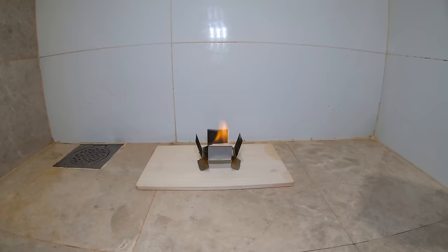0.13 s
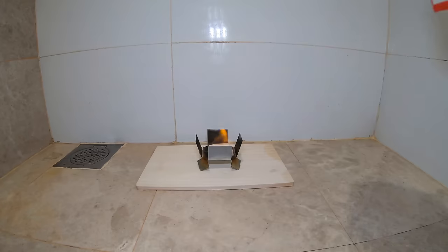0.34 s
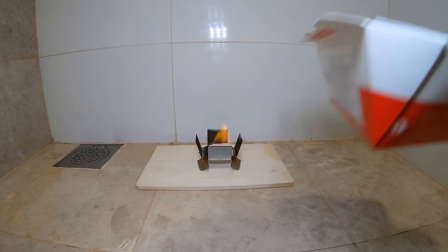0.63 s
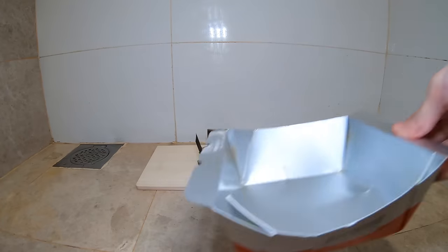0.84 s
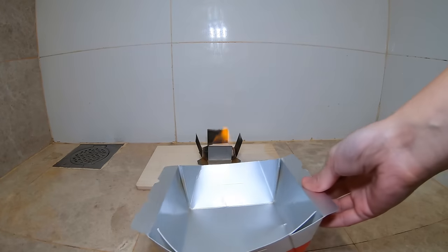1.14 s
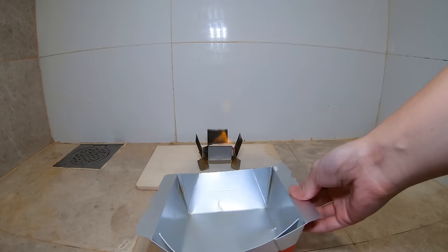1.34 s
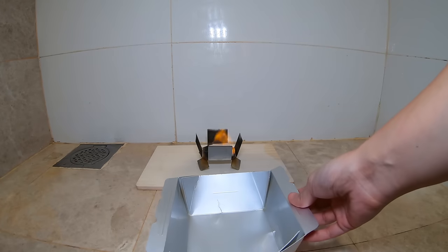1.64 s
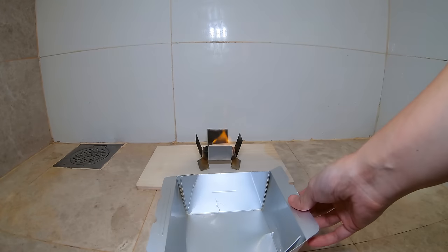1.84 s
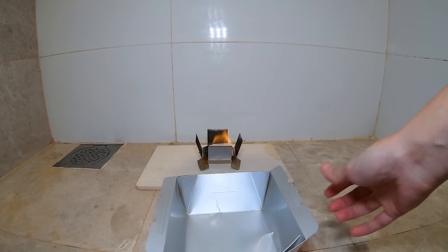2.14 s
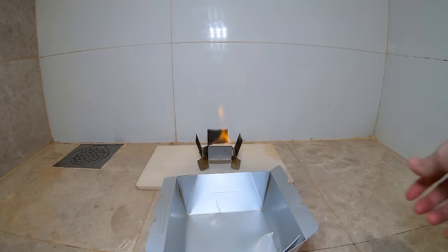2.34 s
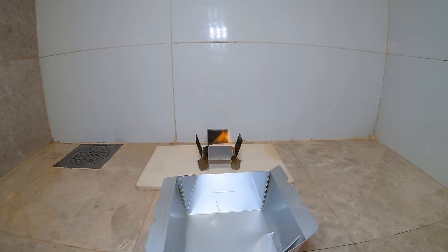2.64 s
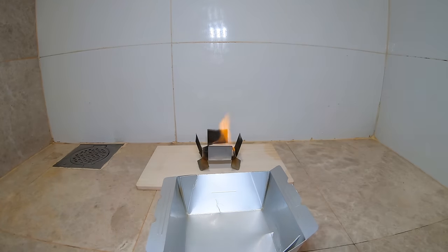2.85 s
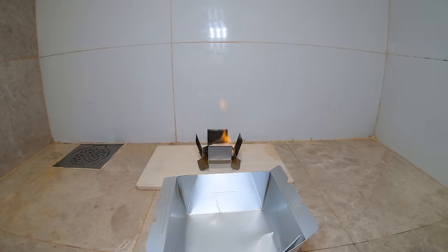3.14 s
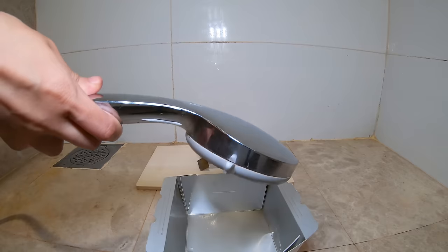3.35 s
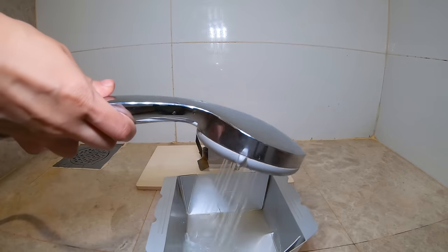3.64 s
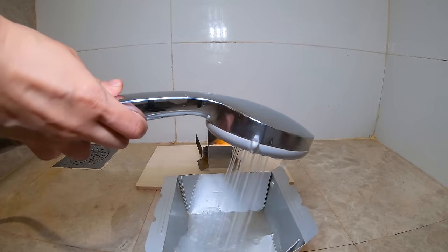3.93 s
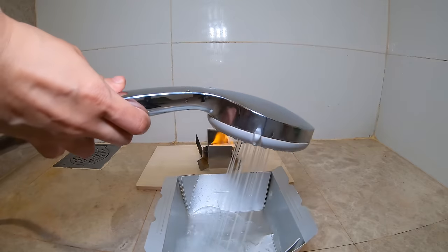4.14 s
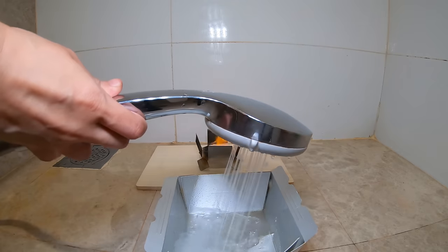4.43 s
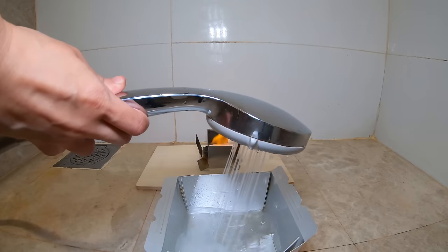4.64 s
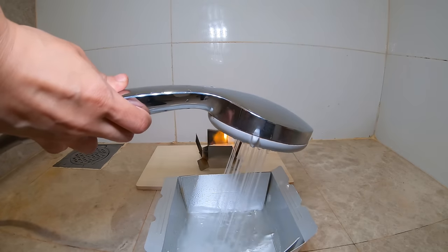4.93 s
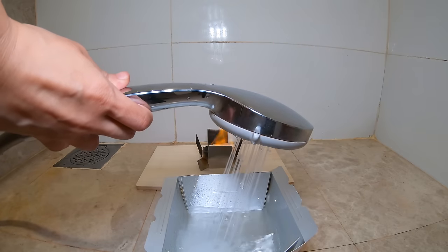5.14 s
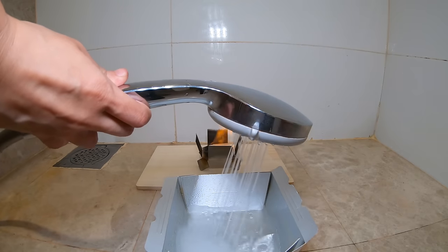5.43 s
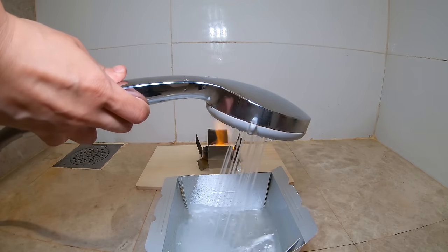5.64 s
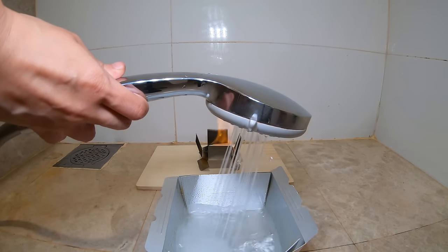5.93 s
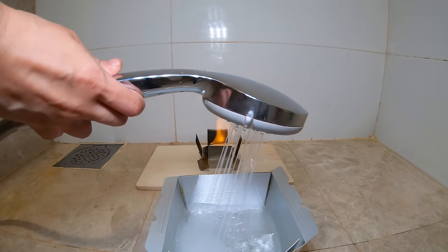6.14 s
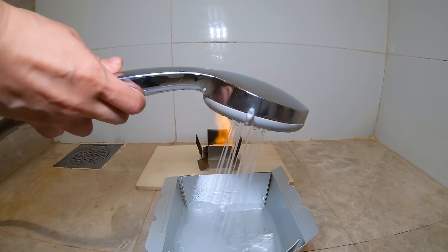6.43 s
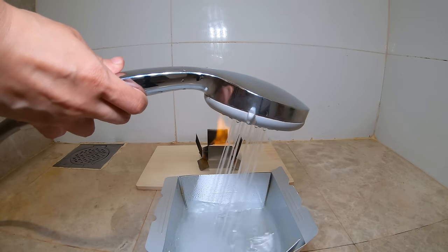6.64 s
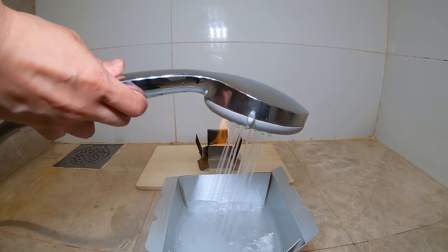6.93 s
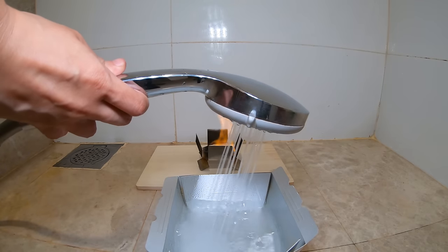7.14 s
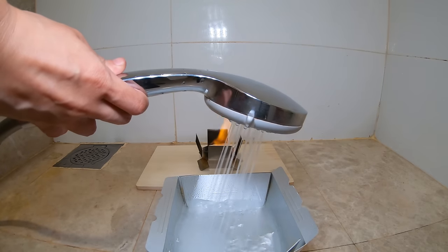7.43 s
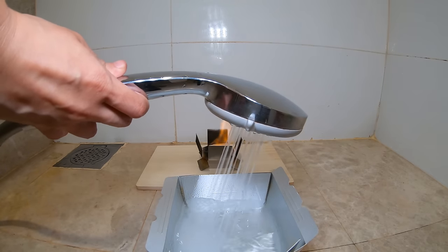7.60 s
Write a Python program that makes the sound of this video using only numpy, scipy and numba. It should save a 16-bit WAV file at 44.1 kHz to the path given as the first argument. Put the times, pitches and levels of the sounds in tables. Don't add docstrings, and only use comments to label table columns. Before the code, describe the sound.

Close to a small microphone in a tiled shower stall, low building rumble sits under faint rustles and foil ticks. A card tray lands with a hollow, ringing thud. After quiet handling, a few drips smack the foil, the shower head spits twice, then bursts into dense spray. Patter on bare foil turns to splashing water with bubbly gurgling as the tray fills.

```python
import sys
import numpy as np
from scipy import signal
from scipy.fft import rfft, irfft, next_fast_len
from scipy.io import wavfile
from scipy.ndimage import uniform_filter1d
from numba import njit

SR = 44100
rng = np.random.default_rng(int(sys.argv[2]) if len(sys.argv) > 2 else 0)


def invert_db(level):
    return 10 ** (np.asarray(level, dtype=float) / 20)


def unload_audio(sound):
    columns = np.transpose(np.atleast_2d(sound))
    steps = np.round(np.clip(columns, -1, 1) * 32767)
    wavfile.write(sys.argv[1], SR, steps.astype(np.int16))


N = 342657
T = np.arange(N) / SR
TAP_S, FULL_S = 3.591, 7.7


def unit(x):
    return x / np.sqrt(np.mean(x ** 2))


def colour(x, shape):
    hz, db = np.transpose(shape)
    f = np.maximum(np.arange(len(x) // 2 + 1) * SR / len(x), 1)
    gain = invert_db(np.interp(np.log(f), np.log(hz), db, left=-90, right=-90))
    return unit(irfft(rfft(x) * gain, len(x)))


def walk(rate):
    hold = int(SR / rate)
    steps = np.repeat(rng.standard_normal(N // hold + 1), hold)
    return 1.4 * uniform_filter1d(uniform_filter1d(steps, hold), hold)[:N]


def bump(s, length):
    return np.cos(np.pi * np.clip((T - s) / length, -.5, .5)) ** 2


def drops(spread_db):
    return rng.standard_normal(N) * invert_db(spread_db * rng.exponential(size=N))


@njit
def rings(start, hz, t60, glide, size):
    out = np.zeros(N)
    for k in range(len(start)):
        z = size[k] + 0j
        p = np.exp(2j * np.pi * hz[k] / SR - np.log(1000) / (t60[k] * SR))
        length = int(t60[k] * SR * .7)
        turn = np.exp(2j * np.pi * hz[k] / SR * glide[k] / length)
        for i in range(start[k], min(N, start[k] + length)):
            out[i] += z.imag
            z *= p
            p *= turn
    return out


def resonances(f, modes):
    return sum(gain * 1j * f * w / (m * m - f * f + 1j * f * w) for m, w, gain in modes)


def depth():
    return np.clip((T - TAP_S) / (FULL_S - TAP_S), 0, 1)


def filling(shallow_db, bare_db, cover_s, full_db, power):
    bare_foil = np.exp(-np.abs((T - TAP_S) / cover_s) ** 4)
    return shallow_db + bare_db * bare_foil + full_db * depth() ** power


# start_s, level_db
FLOW = [
    (3.591, -22),
    (3.6, -15),
    (3.621, -15),
    (3.664, -23.5),
    (3.692, -18.5),
    (3.712, -24),
    (3.743, -13),
    (3.9, -16.5),
    (4.08, -15.5),
]


def froth_db():
    s, db = np.transpose(FLOW)
    return np.interp(T - 0.021, s, db - db[-1], left=-25)


# middle_s, length_s, rustle_db, dull_rustle_db, stall_stir_db
MOVES = [(0.01, 0.12, -70, -66, 12), (0.5, 0.36, -64, -79, 6.5), (0.66, .2, -74, -64, 6),
         (1.056, 0.5, -75, -66, 10.5), (1.32, .2, -71, -67, 4), (1.628, 0.19, -65, -60, 14.5),
         (1.76, .2, -61, -55, 4), (2, 0.11, -56, -58, 1), (2.04, .1, -64, -66, 8), (1.9, 0.73, -65, -64, 8),
         (2.237, 0.14, -66, -72, 7), (2.44, 0.18, -66, -72, 6), (2.58, 0.23, -62, -56, 9),
         (2.79, 0.49, -59, -62, 3), (3.2, 0.74, -60.5, -82, 4), (3.51, 0.12, -52, -62, 11),
         (3.57, 0.13, -38, -33, 10)]
# pitch_hz, level_db (per Hz)
RUMBLE_SHAPE = [(6, -36), (11, 12), (18, -5), (30, -9.5), (42, -13), (48, -3.5), (55, -9.5), (78, -15.5),
                (89, -8.5), (98, -18), (135, -43)]
# pitch_hz, level_db (per Hz)
AIR = [(71, -52), (120, -3.5), (141, -3.5), (271, -2), (313, -11.5), (353, -8), (460, -14), (651, -11),
       (751, -11.5), (1300, -19.5), (2300, -24), (7350, -27), (15600, -37)]
# pitch_hz, width_hz, level_db
BOOM_MODES = [(189, 28, -4.5), (272.8, 12.7, -1), (354, 40, 1), (413.3, 13.2, 0.5), (503.6, 13, -4)]


def background():
    duck_s, fall_s, recover_db_per_s = 3.8, .35, 3
    fall = np.clip((T - duck_s) / fall_s, 0, 1)
    recovery_db = recover_db_per_s * np.maximum(T - duck_s - fall_s, 0)
    duck_db = np.minimum(-8.5 * fall + recovery_db, 0)
    stir_db = sum(db * bump(s, 1.47 * length) for s, length, _, _, db in MOVES)
    wet = T > TAP_S
    wet_air_db = filling(shallow_db=-69.5, bare_db=18, cover_s=.5, full_db=13, power=0.1)
    drum_db = filling(shallow_db=-57, bare_db=16.5, cover_s=0.6, full_db=19.5, power=1.2)
    air_gain = invert_db(-53.5 + 0.19 * stir_db + 0.91 * duck_db) + wet * invert_db(wet_air_db + 0.5 * froth_db())
    boom_gain = invert_db(-62.5 + stir_db + duck_db) + wet * invert_db(drum_db + 0.21 * froth_db())

    rumble = colour(rng.standard_normal(N), RUMBLE_SHAPE) * invert_db(-33.5 + duck_db + 1.9 * walk(5.02))
    air_shape = AIR + [(16500, AIR[-1][1])]
    air = colour(rng.standard_normal(N), air_shape) * air_gain * invert_db(0.28 * walk(6))
    f = np.arange(N // 2 + 1) * SR / N
    peaks = resonances(f, [(m, w, invert_db(db)) for m, w, db in BOOM_MODES])
    boom = unit(irfft(rfft(rng.standard_normal(N)) * peaks ** 2, N))
    return rumble + air + boom * boom_gain * invert_db(-2.0 + 1.6 * walk(9))


# pitch_hz, width_hz, level_db (over the even response)
STALL = [(87, 14, -5), (170, 130, -8), (248, 8.4, 9.5), (357, 18, 5), (421, 5.8, -21), (470, 49, -1.5),
         (613, 12, 1.5), (926, 27, 7.5), (1109, 10, 7), (1187, 58, 5.5), (1334, 35, 3.5), (1770, 93, 1.5),
         (2500, 160, 1.5), (2800, 150, 0.5), (3940, 41, 4)]
# pitch_hz, t60_s
STALL_T60 = [(100, 0.15), (500, 0.94), (2000, 0.63), (8000, 0.11), (16000, 0.33)]


def stall(x, wet_db):
    t = T[:SR]
    hz, t60 = np.transpose(STALL_T60)
    tail = 0
    for centre in 100 * 2. ** np.arange(8):
        band = colour(rng.standard_normal(SR), [(centre / 2, -20), (centre, 0), (centre * 2, -20)])
        decay = invert_db(-60 * t / np.interp(np.log(centre), np.log(hz), t60))
        tail = tail + band * np.sqrt(centre / SR) * decay
    tail = tail * (t > .003) * invert_db(wet_db) / 30
    tail[0] = 1
    size = next_fast_len(N + SR)
    f = np.arange(size // 2 + 1) * SR / size
    modes = 1 + resonances(f, [(m, w, invert_db(db) - 1) for m, w, db in STALL])
    return irfft(rfft(x, size) * rfft(tail, size) * modes, size)[:N]


# pitch_hz, level_db (per Hz)
RUSTLE = [(1500, -11), (3000, -6.5), (7000, 1.5), (10000, -2.5), (15500, -17)]


def hand():
    rest = invert_db(-69)
    bright_gain = rest + sum(invert_db(db) * bump(s, length) for s, length, db, _, _ in MOVES)
    dull_gain = rest + sum(invert_db(db) * bump(s, length) for s, length, _, db, _ in MOVES)
    bright = colour(drops(2.6), RUSTLE) * bright_gain * invert_db(-2.5 + 1.0 * walk(26.9))
    dull = colour(drops(1.5), [(700, -13), (1500, -2.5), (3200, -4.0), (5000, -9)])
    dull = dull * dull_gain * invert_db(-5.5 + 1.2 * walk(25.8))
    return (bright + dull) * (T < FLOW[1][0])


# pitch_hz, level_db (per Hz)
SIZZLE = [(8000, -1), (10500, -3), (13000, -8), (15700, -10.5), (16500, -40)]


def crackles(events, top_db, t60_s):
    out = np.zeros(N)
    t = T[:SR // 5]
    rise = np.clip(t / 0.0013, 0, 1)
    snap = 1 + 1.3 * np.exp(-t / 0.0015)
    for s, db, hz, low_db in events:
        noise = rng.standard_normal((3, len(t)))
        ring_shape = [(hz / 4, -20), (hz * 0.82, -7), (hz, 0), (hz * 1.18, -7), (hz * 4.7, -19)]
        high = colour(noise[0], ring_shape)
        low = colour(noise[1], [(500, -6.5), (1300, -4), (3000, -16.0)])
        top = colour(noise[2], SIZZLE)
        burst = high + invert_db(low_db) * low + invert_db(top_db) * top
        i = int(s * SR)
        out[i:i + len(t)] += invert_db(db - 7 - 60 * t / t60_s) * rise * snap * burst
    return out


# start_s, peak_db, pitch_hz, low_part_db
TICKS = [(0.429, -49, 1300, -2), (0.4589, -46, 7870, -15), (0.4794, -49, 7040, -14), (0.574, -50, 3580, -6),
         (0.604, -43, 8050, -29.5), (0.6454, -48, 3500, -2), (0.799, -48, 1600, -4),
         (1.311, -47, 7000, -12), (1.497, -32, 3290, 5), (1.675, -45, 3090, -3), (1.6841, -44, 3510, 5),
         (1.7394, -42, 2500, 0), (1.769, -45.5, 2570, -3), (1.7894, -51, 2550, -11),
         (1.8194, -48, 6800, -9), (1.8547, -43, 7240, -9), (1.929, -53, 4330, 0), (1.9693, -45, 900, -6),
         (1.9806, -36, 1850, -7), (1.9967, -35, 3570, -20), (2.0594, -47, 6960, -17),
         (2.1045, -41, 7140, -9), (2.202, -43, 6520, -9), (2.3096, -48, 6700, -15),
         (2.801, -32.5, 7960, -15), (3.0729, -48, 3560, 1), (3.303, -43, 5270, -12), (3.3317, -51, 2750, 0),
         (3.3767, -42, 7170, -21)]


def ticks():
    return crackles(TICKS, top_db=-21, t60_s=0.057)


# start_s, peak_db
KNOCKS = [(0.643, -43), (0.912, -39), (1.043, -41), (1.302, -44), (1.498, -11.5), (1.684, -43),
          (1.967, -44), (1.985, -34), (2.205, -47), (3.329, -42), (3.589, -31), (3.621, -25.5)]
# pitch_hz, level_db, t60_s
POT = [(187, -31, 0.33), (300, -7.5, 0.28), (347, -1, 0.12), (407, -3.5, 0.37), (516, -8, .15),
       (612, -17, 0.62), (713, -11, 0.19), (847, -24, 0.14), (900, -22, 0.053), (1080, -16, .1),
       (1160, -27, 0.1), (1696, -15, 0.066)]


def knocks():
    hz, db, t60 = np.transpose(POT)
    out = np.zeros(N)
    t = T[:SR // 5]
    for s, blow_db in KNOCKS:
        chance = rng.standard_normal((2, len(hz)))
        i = int(s * SR)
        dull_db = 0.14 * (blow_db + 12) * np.log2(hz / 300)
        size = invert_db(blow_db + db + dull_db - 5 + 0.58 * chance[1])
        out += rings(np.full(len(hz), i), hz * (1 + 0.0066 * chance[0]), 0.52 * t60, 0 * hz, size)
        thud = colour(rng.standard_normal(len(t)), [(170, 3), (310, 13), (900, -1), (2500, -36)])
        out[i:i + len(t)] += invert_db(blow_db - 14.5 - 60 * t / 0.18) * thud
    return .6 * out + np.roll(out, int(.0061 * SR))


# start_s, peak_db, pitch_hz, low_part_db
DRIPS = [
    (3.4487, -32, 2500, -3),
    (3.493, -29, 2550, -10),
    (3.502, -29.5, 7440, -19),
    (3.5092, -37, 5000, 0),
    (3.526, -33, 1900, -4),
    (3.544, -30.5, 1900, -2),
    (3.5531, -19, 5700, -9),
    (3.612, -13, 3870, -20),
    (3.624, -11, 6400, -14),
]


def drips():
    return crackles(DRIPS, top_db=-15, t60_s=0.077)


def bubbles(centre_hz, octaves, rate, cycles, glide, spread_db):
    most = 3000
    chance = rng.random((int(N / SR * most), 3)).T
    pitch = rng.standard_normal(chance.shape[1])
    keep = chance[2] < rate / most
    start = (chance[0, keep] * N).astype(np.int64)
    hz = (centre_hz + 0 * T)[start] * 2 ** (octaves * np.clip(pitch[keep], -2, 2))
    size = invert_db(-spread_db * np.log(chance[1, keep] + 1e-9))
    x = rings(start, hz, cycles * 2 / hz, glide + 0 * hz, size)
    return colour(x, [(hz.min() / 4, -50), (hz.min(), 0), (SR / 2, 0)])


# middle_s, length_s, middle_bubbles_db, small_bubbles_db
SURGES = [
    (3.621, 0.02, 5, -1),
    (3.8, 0.18, 2, 2),
    (4.08, 0.25, 2.5, -1),
    (4.418, 0.62, -3, 1),
    (4.736, 0.33, 5.5, -0.5),
    (4.87, 0.12, 2.5, -2),
    (5.8, 0.99, -2.5, 1.5),
    (6.526, 0.19, 2.5, 2),
    (6.856, 0.61, 3, 1.5),
    (7.667, 0.31, -0.5, 2),
]
# pitch_hz, level_db (per Hz)
PATTER = [(1650, -12.5), (2800, -4), (3200, -8.5), (3530, -5), (4920, -5), (5680, -3), (6350, -4),
          (7210, -1.5), (10500, -13), (13600, -35), (22000, -120)]


def spray():
    sag_db_per_s = -0.4251
    flow_db = np.interp(T, *np.transpose(FLOW)) + sag_db_per_s * np.maximum(T - FLOW[-1][0], 0)
    patter = colour(drops(1.9), PATTER) * invert_db(.5 * walk(40))
    top_db = filling(shallow_db=-13.5, bare_db=8, cover_s=0.28, full_db=8, power=0.34)
    sizzle = colour(drops(1.8), SIZZLE) * invert_db(top_db + 0.47 * walk(36))
    jets = invert_db(flow_db - 3.0) * (patter + sizzle)

    surge_db, spit_db = sum(np.outer(db, bump(s, length)) for s, length, *db in SURGES)
    small_db = filling(shallow_db=-26, bare_db=5.5, cover_s=1.68, full_db=0.5, power=0.5)
    small_db = small_db + spit_db + 0.66 * froth_db()
    middle_db = filling(shallow_db=-31.5, bare_db=7, cover_s=1.0, full_db=8.5, power=1.85)
    middle_db = middle_db + surge_db + 0.6 * froth_db()
    deep_db = filling(shallow_db=-47, bare_db=10.5, cover_s=.8, full_db=16.5, power=1)
    deep_db = deep_db + 0.46 * froth_db()
    small_hz = 2050 + (2500 - 2050) * depth()
    middle_hz = 1244 + (1131 - 1244) * depth()
    fizz = bubbles(small_hz, octaves=0.35, rate=2600, cycles=5.2, glide=0.097, spread_db=2)
    middle = bubbles(middle_hz, octaves=0.25, rate=1500, cycles=8, glide=0.14, spread_db=2)
    gurgle = bubbles(634, octaves=0.24, rate=600, cycles=10.8, glide=0.22, spread_db=1)
    fizz = fizz * invert_db(small_db + 0.13 * walk(12))
    middle = middle * invert_db(middle_db + 1.2 * walk(10))
    gurgle = gurgle * invert_db(deep_db + 0.88 * walk(5.6))
    pool = invert_db(-4) * (fizz + middle + gurgle)

    tap_open = np.clip((T - TAP_S) / 0.0016, 0, 1)
    return tap_open * invert_db(0.19 * walk(18)) * (jets + pool)


# start_s, end_s, level_db (under the common sound)
PARTINGS = [
    (3.782, 3.863, -19),
    (5.977, 6.104, -18),
    (6.4, 6.908, -21),
    (7.086, 7.9, -21),
]
# pitch_hz, level_db
APART_TILT = [(5, -13), (130, 11.5), (1200, 1.5), (4000, 3), (9000, 3.5), (16000, 15), (22050, 10)]


def scene():
    near = stall(spray() + hand(), wet_db=-9.0)
    near = near + stall(ticks() + drips(), wet_db=-5.5) + stall(knocks(), wet_db=-8.5)
    mono = near + background()
    fade_db_per_s = -7
    spells = sum(invert_db(db + fade_db_per_s * (T - a)) * (T > a) * (T < b) for a, b, db in PARTINGS)
    apart = invert_db(-38) + uniform_filter1d(spells, size=1000)
    trace = colour(np.roll(mono, 97), APART_TILT) * np.std(mono) * apart * invert_db(2.4 * walk(15))
    return np.array([mono + trace, mono - trace])


def low_pass(x):
    return signal.sosfilt(signal.butter(12, 15780, fs=SR, output="sos"), x)


def record(dry):
    limited = 0.94 * np.tanh(dry / 0.86)
    top_cut = signal.ellip(10, .2, 70, 15850, fs=SR, output="sos")
    mix = signal.sosfilt(top_cut, limited)
    return low_pass(mix)


dry = scene()
out = record(dry)
unload_audio(out)
```